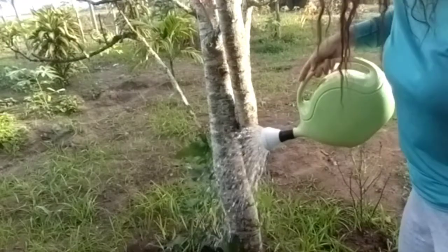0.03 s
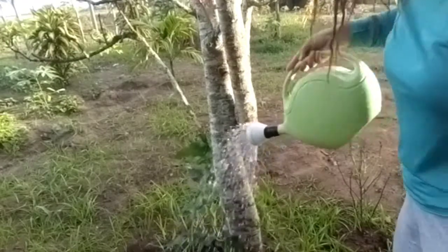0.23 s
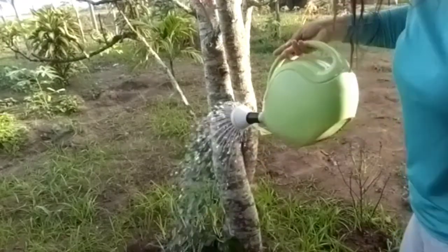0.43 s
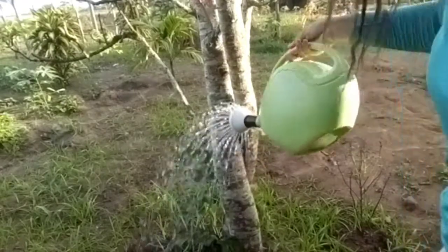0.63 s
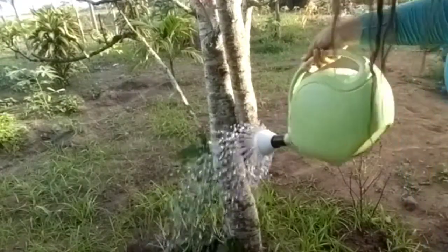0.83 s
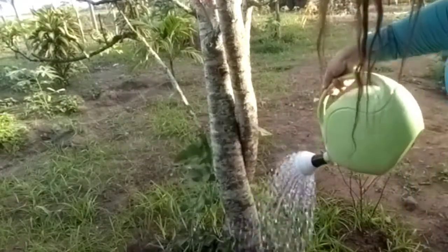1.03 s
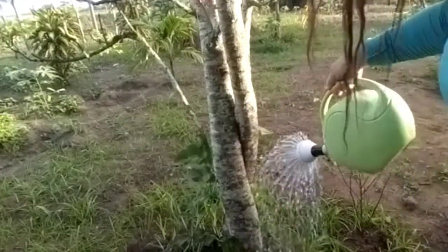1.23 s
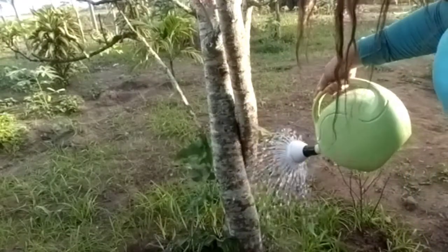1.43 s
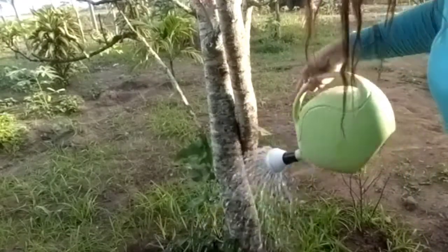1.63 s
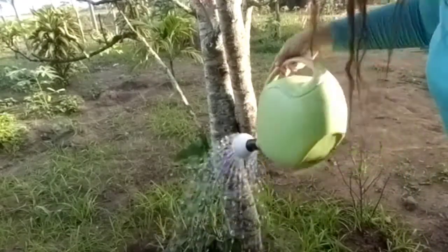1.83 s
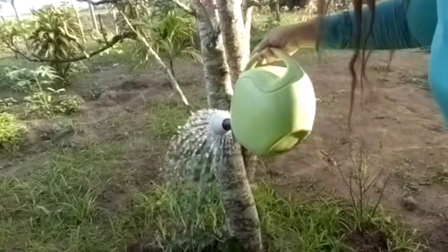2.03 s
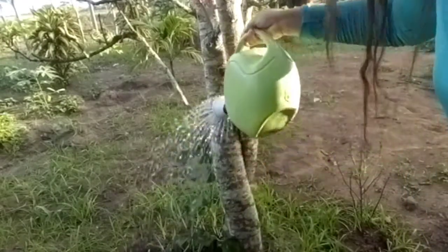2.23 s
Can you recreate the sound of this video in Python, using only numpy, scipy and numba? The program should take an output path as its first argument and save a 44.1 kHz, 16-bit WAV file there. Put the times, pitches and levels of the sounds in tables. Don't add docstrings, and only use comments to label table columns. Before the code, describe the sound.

Fine water spray hisses and patters from a can, with fat drops snapping on bark and leaves and hollow glugs beneath; a faint reedy birdcall comes early, a longer arched whistle late, in quiet open air, heard from nearby.

```python
import sys
import numpy as np
from scipy import signal
from scipy.fft import rfft, irfft
from scipy.io import wavfile
from scipy.ndimage import uniform_filter1d
from numba import njit

SR = 44100
rng = np.random.default_rng(int(sys.argv[2]) if len(sys.argv) > 2 else 0)


def generate_wav(sig):
    pcm = np.round(np.clip(np.atleast_2d(sig).T, -1, 1) * 32767).astype(np.int16)
    wavfile.write(sys.argv[1], SR, pcm)


def magnitude_from_level(level_db):
    exponent = np.asarray(level_db, float) / 20
    return 10 ** exponent


N = 100636
T = np.arange(N) / SR

# frequency in Hz, level in dB.
SPRAY_COLOUR = [(1200, -14), (2800, -9), (4700, -6), (6300, 1), (7300, -4), (8600, -11.5), (13000, -19),
                (15700, -12.5)]
DROP_RISE = .025


def unit(x):
    return x / np.sqrt(np.mean(x ** 2))


def colour(x, points):
    hz, db = np.array(points).T
    f = np.maximum(np.arange(N // 2 + 1) * SR / N, 1)
    curve_db = np.interp(np.log(f), np.log(hz), db)
    bass_cut_db = 12 * np.minimum(np.log2(f / hz[0]), 0)
    return irfft(rfft(x) * magnitude_from_level(curve_db + bass_cut_db), N)


def walk(rate):
    hold = int(SR / rate)
    levels = rng.standard_normal(N // 40)[:N // hold + 1]
    slewed = uniform_filter1d(np.repeat(levels, hold), hold)
    return unit(uniform_filter1d(slewed, hold // 2)[:N])


@njit
def rings(length, start, step, cycles, size, rise):
    out = np.zeros(length)
    for g in range(len(start)):
        i = int(start[g])
        turns = (i + 1 - start[g]) * step[g]
        while turns < 2.5 * cycles[g] and i + 1 < length:
            i += 1
            u = 3 * turns / cycles[g]
            swell = np.e * u * np.exp(-u)
            out[i] += size[g] * swell * np.sin(2 * np.pi * turns * (1 + rise * turns / 2))
            turns += step[g]
    return out


def ring(s, db, hz, cycles, rise):
    step = np.minimum(hz / SR, .42)
    return rings(N, s * SR, step, np.maximum(cycles + 0 * s, .5), magnitude_from_level(db), rise)


def rain(per_s, hz, cycles, scatter_db, flurry):
    when, pitch, size, length = rng.random((9000, 4))[:int(per_s * N / SR)].T
    db = -scatter_db * np.log(size + 0.03) + flurry[(when * N).astype(int)]
    return when * N / SR, db, hz(pitch), cycles * (.5 + length)


def air():
    # frequency in Hz, level in dB.
    air_colour = [(25, -33), (45, -11), (75, -4), (190, -2.5), (450, -7), (700, -9.5), (1300, -31)]
    breeze = unit(colour(rng.standard_normal(N), air_colour + [(4000, -26)]))
    return magnitude_from_level(-70 + walk(7)) * breeze


def song(table, partials, flutter_db, burr):
    echo_db, echo_s, burr_hz = -5, .1, 420
    s, hz, db = np.array(table).T
    pitch = np.interp(T, s, hz) * (1 + .002 * walk(90))
    phase = 2 * np.pi * np.cumsum(pitch) / SR
    gain = magnitude_from_level(np.interp(T, s, db, -120, -120) + 4.5)
    tone = gain * sum(magnitude_from_level(d + flutter_db * walk(30.4)) * np.sin(k * phase) for k, d in partials)
    tone = tone * (1 + burr * np.gradient(walk(burr_hz)) * SR / burr_hz / 1.5)
    lag = np.arange(SR // 2) / SR
    trees = rng.standard_normal(len(lag)) * np.exp(-lag / echo_s) * (lag > .01)
    trees = trees / np.sqrt(np.sum(trees ** 2))
    return tone + magnitude_from_level(echo_db) * signal.fftconvolve(tone, trees)[:N]


def reedy_call():
    # time in seconds, fundamental in Hz, level in dB.
    contour = [
        (.51, 1120, -80),
        (.55, 1140, -66),
        (.6, 1158, -67),
        (.655, 1155, -64),
        (.685, 1090, -63),
        (.712, 970, -64),
        (.73, 900, -82),
    ]
    # multiple of the fundamental, level in dB.
    partials = [(2, -9), (3, -4), (4, 0)]
    return song(contour, partials, 1.04, 0)


def whistle():
    # time in seconds, pitch in Hz, level in dB.
    arch = [
        (1.62, 2350, -72),
        (1.645, 2450, -55),
        (1.72, 2630, -53),
        (1.83, 2716, -52.5),
        (1.89, 2718, -53),
        (2.0, 2670, -56),
        (2.1, 2625, -60),
        (2.22, 2475, -63),
        (2.28, 2290, -66),
    ]
    burr = np.interp(T, [1.68, 2.1], [0, .75])
    return song(arch, [(1, 0)], 1.5, burr)


def can():
    # time in seconds, peak in dB, pitch in Hz, length in cycles.
    glugs = [(0.063, -58, 423, 2.5), (0.269, -55.5, 345, 2.35), (.2, -60, 840, 12), (.28, -62, 700, 10.5),
             (0.473, -63, 363, 8.3), (.75, -65, 797, 23), (0.841, -62, 375, 15), (.82, -82, 920, 13),
             (.88, -61, 904, 22), (.9, -66.5, 336, 6.5), (.97, -63.5, 915, 18), (1.019, -61.5, 351, 15),
             (1.128, -66.5, 325, 14), (1.199, -63.5, 384, 8.2), (1.267, -67, 410, 4.9),
             (1.469, -71, 235, 7.9), (1.51, -69, 1092, 15), (1.701, -65.5, 320, 7.2), (1.65, -62, 854, 12),
             (1.8, -59, 970, 6.7), (2.0, -60.5, 903, 5.9)]
    # time in seconds, peak in dB, pitch in Hz, length in cycles.
    slops = [
        (1.066, -51.5, 894, 8.5),
        (1.62, -49.5, 184, 3.6),
        (1.657, -50, 158, 3.4),
    ]
    s, db, hz, cycles = np.repeat(np.array(glugs, float), 16, axis=0).T
    late, louder, sharper = rng.standard_normal((len(s), 3)).T
    start = np.maximum(s + .03 * late, 0)
    bubbles = ring(start, db - 5 + 2.2 * louder, hz * np.exp(0.149 * sharper), cycles, 0.0031)
    return bubbles + ring(*np.array(slops, float).T, 0.0084)


def patter():
    per_s, centre_hz, octaves, cycles, scatter_db = 1000, 2000, 1.25, 9, 2.0
    patch_db, patch_per_s = 2, 14

    def patch(k):
        def pitch(u):
            return centre_hz * 2 ** (octaves * (2 * (k + u) / 4 - 1))
        drops = rain(per_s / 4, pitch, cycles, scatter_db, patch_db * walk(patch_per_s))
        return ring(*drops, 0.)
    return unit(sum(patch(k) for k in range(4)))


def shower():
    # time in seconds, level in dB, share of dull soil patter in dB.
    flow = [(0, -53, 7), (0.044, -55.5, 6.5), (.065, -50, 11.5), (0.132, -49.5, -9), (.27, -47.5, 5),
            (.45, -52, 6), (.68, -49, -2), (.77, -48, 7), (.95, -43, 5), (1.079, -43.5, 0),
            (1.222, -44, -20), (1.32, -45.5, -1), (1.42, -47.5, -4), (1.75, -45.5, -7.5), (2.02, -48, 0.5),
            (2.16, -48, -9.5), (2.28, -50.5, -2.5)]
    drops_per_s, scatter_db, drop_cycles = 2000, 2.4, 7
    flurry_db, flurry_per_s = 1.1, 35
    droplets_db, mist_db, patter_db = -5, -8.5, -17.5
    s, db, dull_db = np.array(flow, float).T
    dullness_db = np.interp(T, s, dull_db)
    gusts = [flurry_db * walk(flurry_per_s) for _ in range(4)]
    gusts[0] = gusts[0] + .5 * dullness_db
    drops = 0
    for gust, low_hz, span in zip(gusts, (1500, 4200, 8500), (2.8, 2.02, 1.87)):
        t, size, hz, cycles = rain(drops_per_s / 3, lambda u: low_hz * span ** u, drop_cycles,
                                   scatter_db, gust + .5 * gusts[1])
        level = size + 20 * np.log10(hz / 1000) - 10 * np.log10(1 / np.log(span))
        drops = drops + ring(t, level, hz, cycles, DROP_RISE)
    mist_colour = [(hz, d - 7 * (hz < 3800)) for hz, d in SPRAY_COLOUR]
    mist = unit(colour(rng.standard_normal(N), mist_colour))
    spray = magnitude_from_level(droplets_db) * unit(colour(drops, SPRAY_COLOUR)) + magnitude_from_level(mist_db) * mist
    spray = spray + magnitude_from_level(patter_db + dullness_db) * patter()
    return spray * magnitude_from_level(np.interp(T, s, db))


def middling_drops():
    # time in seconds, peak in dB, pitch in Hz.
    ticks = [(0.0649, -42, 7000), (0.1164, -35, 6820.0), (0.1391, -33, 6800), (0.1749, -47, 6160.0),
             (0.1914, -41, 5900), (0.2369, -40, 4670), (0.3123, -31, 6700), (0.3512, -33, 6440.0),
             (0.3556, -31, 6640), (0.4019, -46, 6580.0), (0.4152, -44, 6010.0), (0.442, -40, 6760),
             (0.469, -33.5, 6400), (0.5082, -38, 6540.0), (0.5266, -41, 6620.0), (0.657, -33.5, 6360.0),
             (0.6854, -35, 6690.0), (0.7191, -43, 6230.0), (0.758, -35, 6200), (0.763, -33.5, 4450),
             (0.7678, -34, 6490.0), (0.866, -31, 6160), (0.9178, -36, 6690.0), (0.93, -27, 6130.0),
             (1.0049, -36, 5960.0), (1.0433, -26, 6160), (1.0763, -28.5, 6280.0), (1.0949, -33, 6250.0),
             (1.1071, -31, 5760), (1.2504, -30, 6970.0), (1.3307, -33.5, 5680.0), (1.3754, -36, 6440.0),
             (1.418, -35, 5840.0), (1.4211, -34, 6200), (1.4549, -40, 6230.0), (1.4626, -34, 6200),
             (1.4734, -34, 6100), (1.481, -44, 5960), (1.5217, -39, 7200), (1.5745, -35, 6500),
             (1.588, -35, 7050.0), (1.7571, -34, 5670), (1.766, -31, 6140), (1.8315, -32, 6540),
             (2.0447, -38, 6060.0), (2.1214, -36, 6480.0), (2.1272, -36, 6610.0), (2.2603, -51, 6200)]
    # time in seconds, peak in dB, pitch in Hz.
    blips = [(0.0086, -54, 2130), (0.2308, -60, 1790), (0.2605, -49, 1830.0), (0.2795, -48, 1850),
             (0.3814, -51, 1720), (0.416, -48, 1840.0), (0.6156, -61, 1930.0), (0.96, -41.5, 1930),
             (0.9882, -46, 1900), (1.0302, -53, 1720), (1.3776, -56.5, 1980.0), (1.4429, -58, 1660.0),
             (1.604, -55, 1940.0), (1.7009, -48, 1730), (1.8016, -50, 1620), (1.8227, -53, 1730),
             (1.9293, -52, 1840), (1.9803, -47, 2060.0), (2.0063, -48, 1540), (2.04, -46, 1860.0)]
    # time in seconds, peak in dB, pitch in Hz.
    pips = [
        (0.2804, -45, 3570.0),
        (0.417, -62, 3360),
        (1.1386, -43, 3440),
        (1.3273, -42.5, 3130),
        (1.3784, -42, 3400),
        (1.45, -44, 3460),
        (1.5478, -43.5, 3400.0),
        (1.7569, -45, 3470),
        (2.041, -44, 3330),
        (2.156, -48, 3320),
    ]
    high = ring(*np.array(ticks, float).T, 3.7, 0.0036)
    return high + ring(*np.array(blips + pips, float).T, 4.6, 0.011)


def fat_drops():
    # time in seconds, peak in dB, pitch in Hz, length in cycles.
    fat = [(0.124, -32, 7300, 2.5), (0.16, -36, 4740, 7), (0.2219, -29.5, 6190, 2.5),
           (0.5184, -35, 5970, 11), (0.6619, -42, 4400, 8.1), (0.6885, -39, 6500, 18),
           (0.742, -34, 5300, 1.6), (0.7529, -27, 5960, 0.77), (0.7914, -25.5, 5760, 1.7),
           (0.8186, -26, 7000, 1.8), (0.8588, -20.5, 6150, 2.1), (0.8719, -27, 6050, 1),
           (0.912, -32.5, 5360, 3), (0.9263, -30, 6000, 5.5), (0.9731, -16, 4890, 3.5),
           (0.9976, -31, 6400, 3.4), (1.0378, -26, 6500, 4.1), (1.1025, -25, 4860, 3.4),
           (1.1436, -32, 6860, 5.9), (1.1657, -35, 5180, 5.3), (1.1871, -29.5, 5900, 3),
           (1.293, -33, 6320, 7.5), (1.3654, -31.5, 6820, 11.4),
           (1.5432, -35, 6000, 1.6), (1.5639, -29, 6600, 2.7), (1.6294, -33.5, 5280, 10.3),
                (1.6707, -32, 6750, 3.9), (1.7115, -29.5, 6140, 6.5), (1.7798, -27, 5770, 2.5),
                (1.9097, -41, 6750, 4.4), (1.941, -55, 7300, 4.1), (2.011, -34.5, 6500, 3.3),
                (2.109, -33.5, 6100, 6.4), (2.141, -32, 6000, 8.8), (2.18, -39, 7100, 11),
                (2.2084, -34, 7200, 3.6)]
    # time in seconds, peak in dB, pitch in Hz, length in cycles.
    plops = [(0.0564, -42.5, 2100, 4.2), (0.06, -37.5, 2870, 1.7), (0.9354, -29, 3510, 6.2),
             (1.8966, -30.5, 4300, 2.9), (1.1215, -41, 3330, 8), (1.2181, -39, 3570, 4),
             (1.2985, -50.5, 1830, 7.1), (1.3375, -48, 1980, 8.9), (1.728, -42, 2910, 10),
             (1.8964, -27.5, 2690, 4.2), (1.9951, -28.5, 2900, 3.4)]
    # time in seconds, peak in dB, pitch in Hz.
    snaps = [
        (0.628, -37.5, 9900),
        (0.663, -32, 8340),
        (.689, -29, 10300),
        (.997, -25, 15000),
        (1.366, -32, 8100),
        (1.588, -31, 15200),
        (1.673, -32, 9300),
    ]
    splatter_db, splatter_s, tick_db = -13, 0.0096, -41
    s, db, hz, cycles = np.array(fat + plops).T
    in_puddle = np.arange(len(s)) >= len(s) - len(plops)
    hits = np.zeros(N)
    hits[(s * SR).astype(int)] = magnitude_from_level(np.minimum(db, -29) - 6 * in_puddle)
    tail = signal.lfilter([1], [1, -np.exp(-1 / (splatter_s * SR))], hits)
    grit = unit(colour(rng.standard_normal(N) * magnitude_from_level(3.2 * walk(900)), SPRAY_COLOUR))
    tick = ring(s, db + tick_db, 11000 + 0 * s, 1.0, 0.)
    body = ring(s, db, hz * 0.9, cycles, DROP_RISE)
    sparkle = ring(*np.array(snaps, float).T, 3.2, DROP_RISE)
    return body + sparkle + tick + magnitude_from_level(splatter_db) * tail * grit


def scene():
    birds = whistle() + reedy_call()
    water = shower() + fat_drops() + middling_drops() + can()
    return (water + birds + air())[None]


def top_cut(x):
    return signal.sosfilt(signal.butter(12, 16640, fs=SR, output="sos"), x)


def record(dry):
    port_hz, port_width_hz, port_db, top_hz = 15070, 510, 9, 15800
    f = np.arange(N // 2 + 1) * SR / N
    port = magnitude_from_level(port_db * np.exp(-((f - port_hz) / port_width_hz) ** 4))
    heard = irfft(rfft(dry) * port, N)
    heard = heard * magnitude_from_level(-15 * np.exp(-((T - 2.238) / 0.0031) ** 2))
    heard = signal.sosfilt(signal.ellip(10, .2, 80, top_hz, fs=SR, output="sos"), heard)
    return top_cut(heard)


dry = scene()
out = record(dry)
generate_wav(out)
```